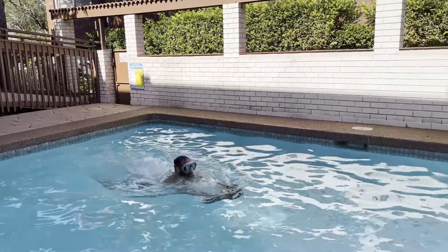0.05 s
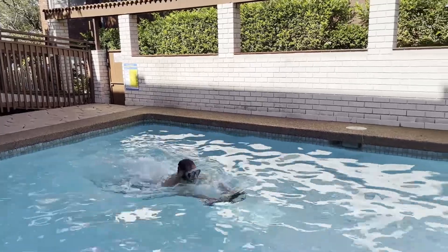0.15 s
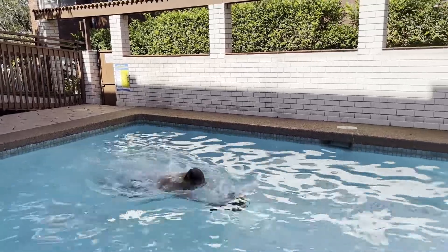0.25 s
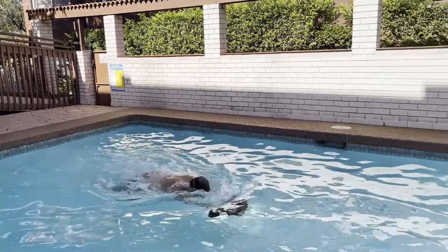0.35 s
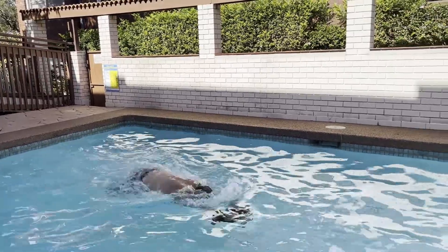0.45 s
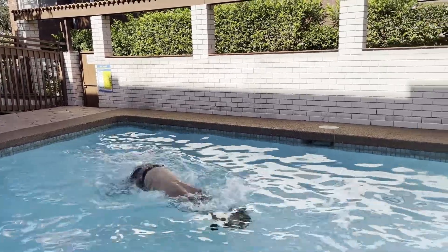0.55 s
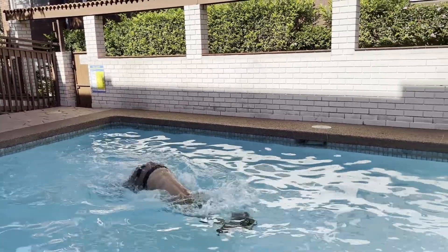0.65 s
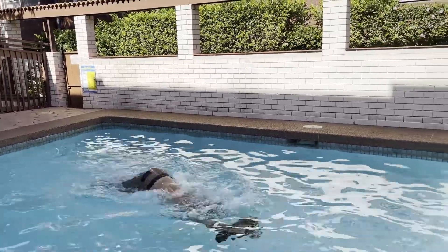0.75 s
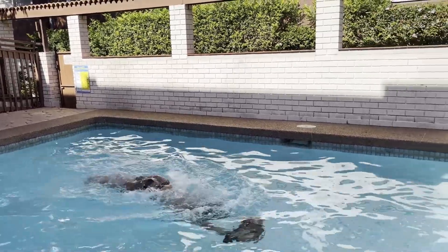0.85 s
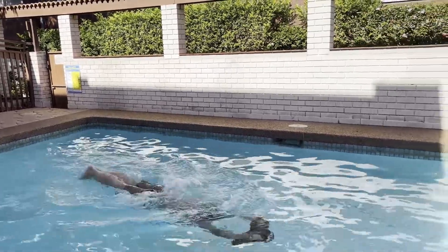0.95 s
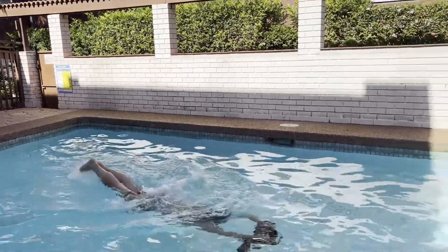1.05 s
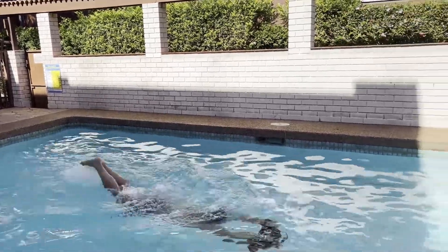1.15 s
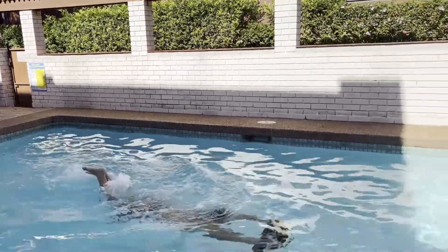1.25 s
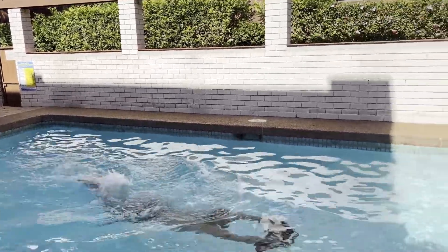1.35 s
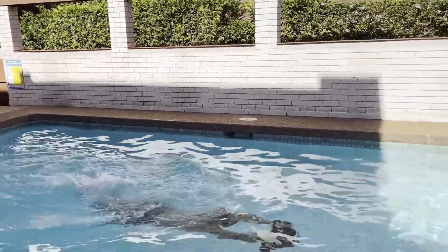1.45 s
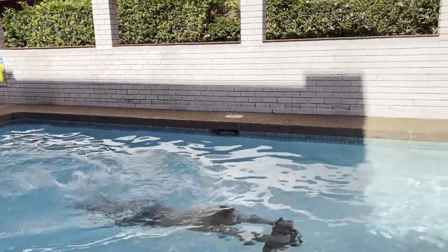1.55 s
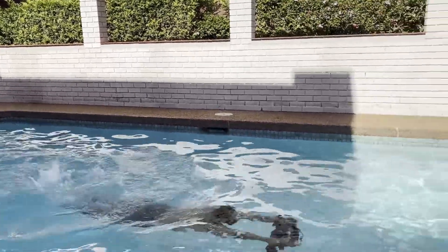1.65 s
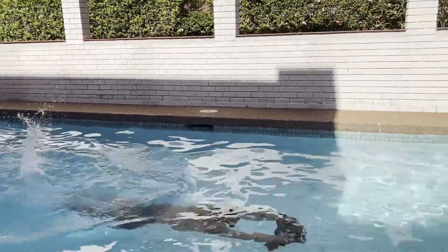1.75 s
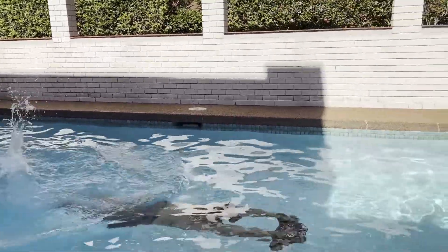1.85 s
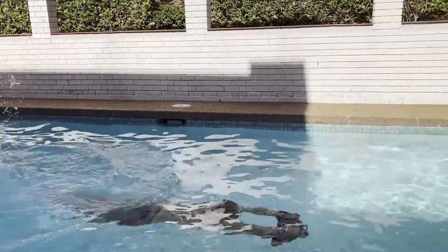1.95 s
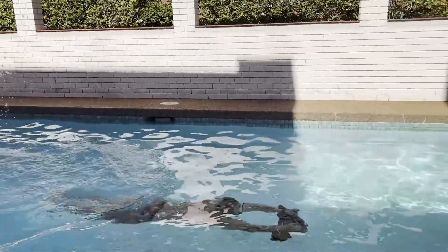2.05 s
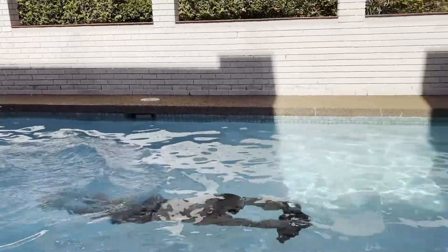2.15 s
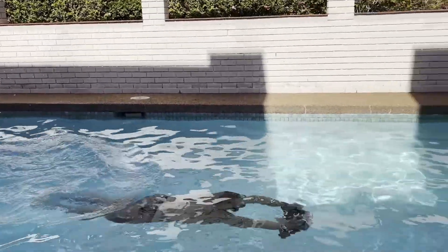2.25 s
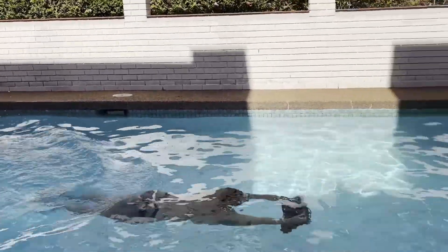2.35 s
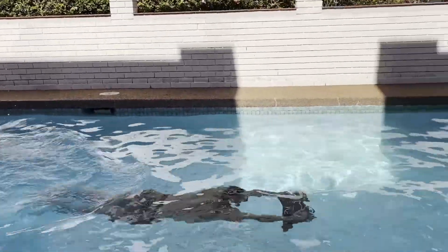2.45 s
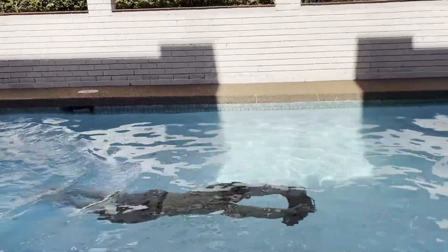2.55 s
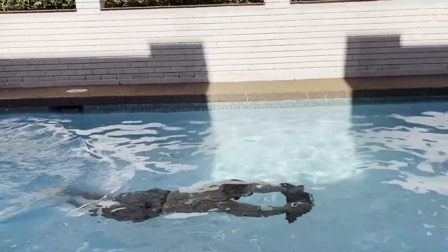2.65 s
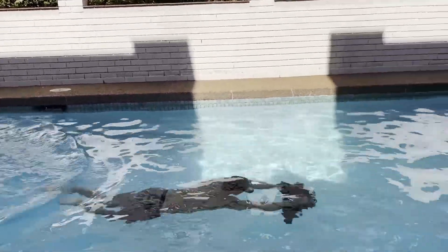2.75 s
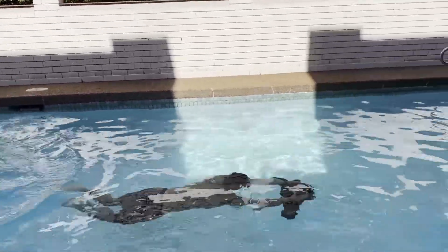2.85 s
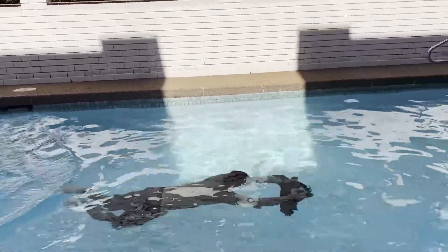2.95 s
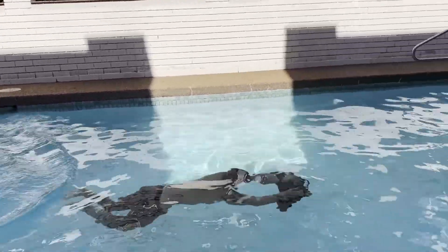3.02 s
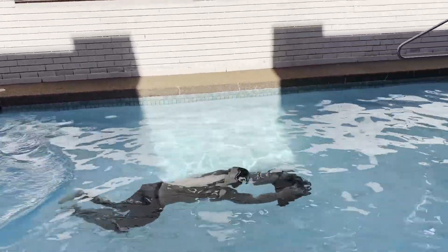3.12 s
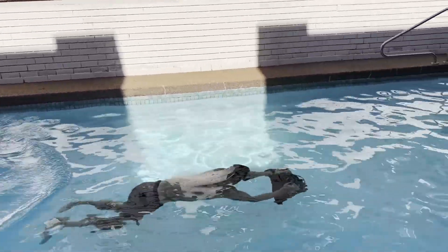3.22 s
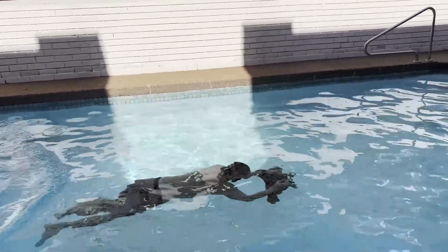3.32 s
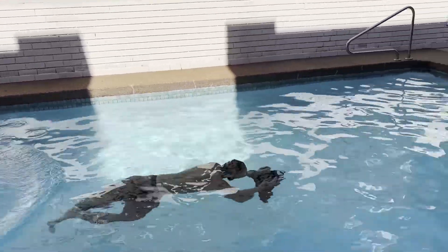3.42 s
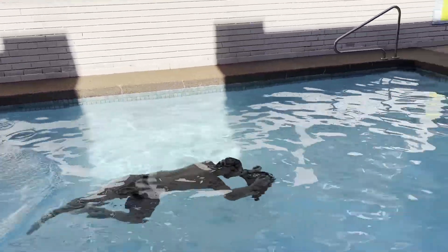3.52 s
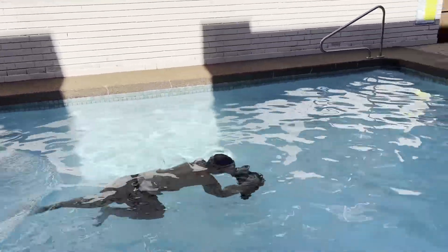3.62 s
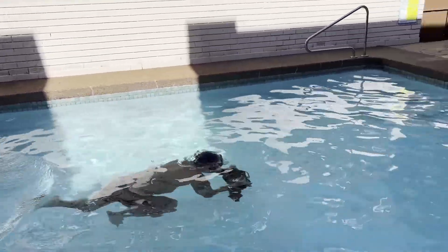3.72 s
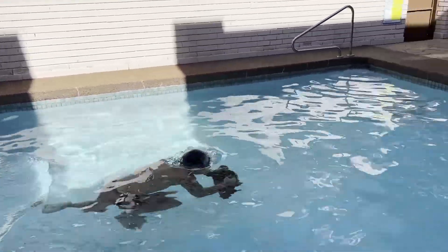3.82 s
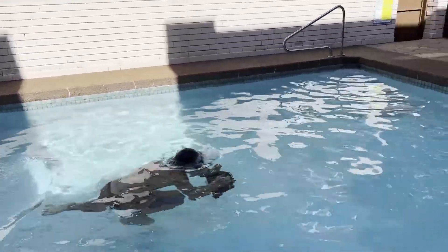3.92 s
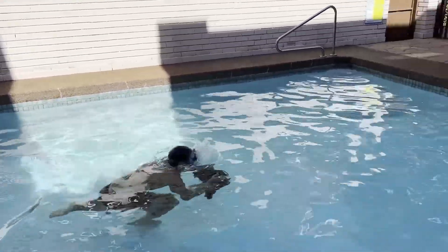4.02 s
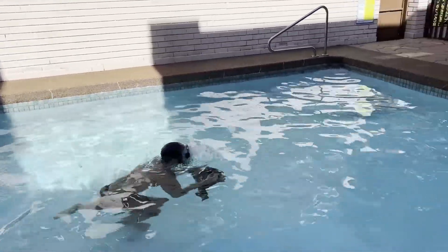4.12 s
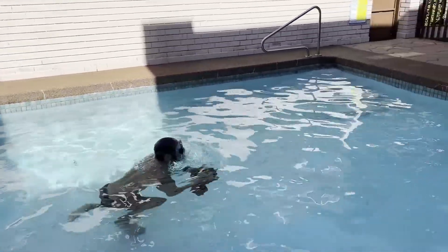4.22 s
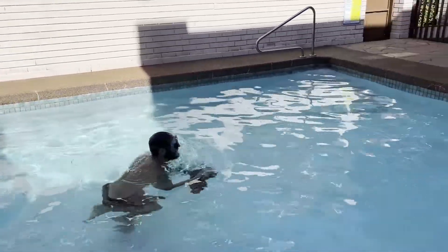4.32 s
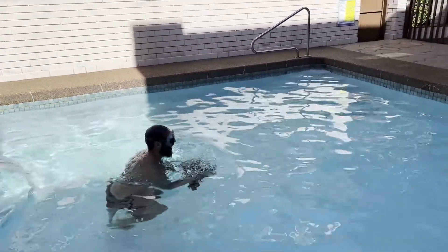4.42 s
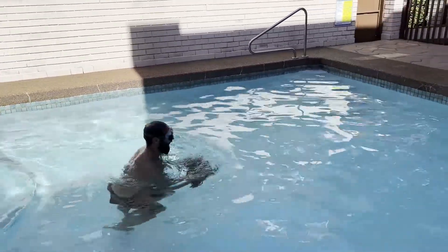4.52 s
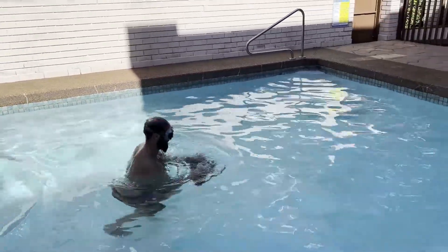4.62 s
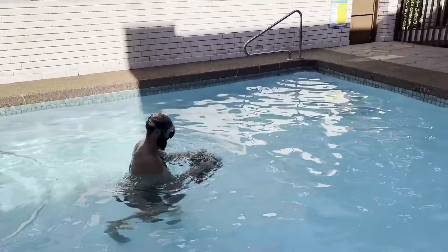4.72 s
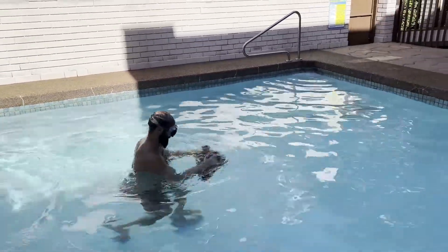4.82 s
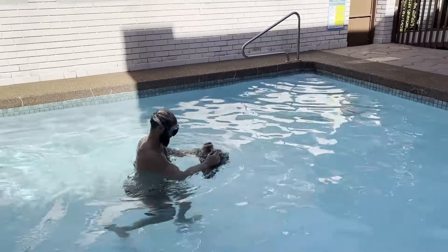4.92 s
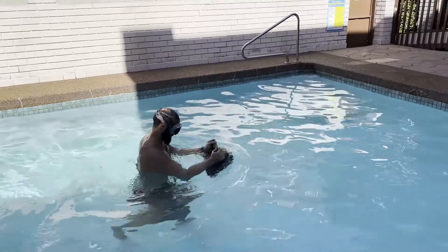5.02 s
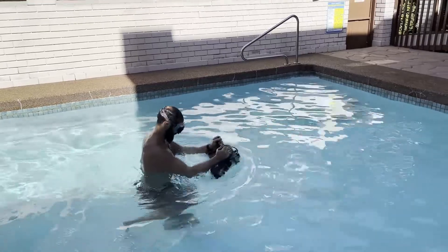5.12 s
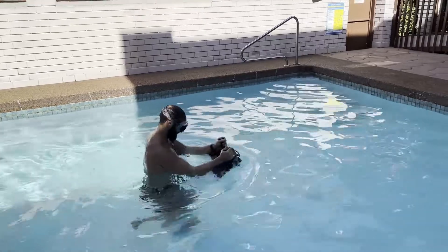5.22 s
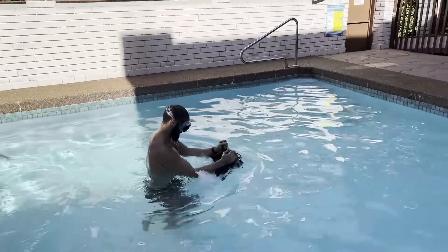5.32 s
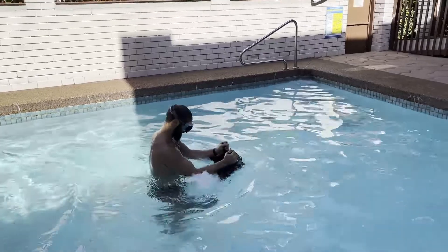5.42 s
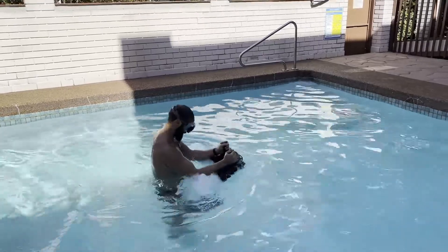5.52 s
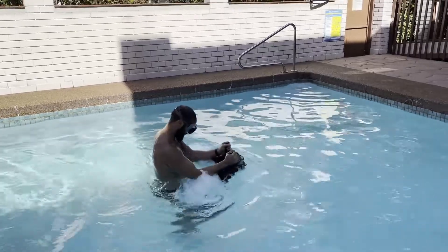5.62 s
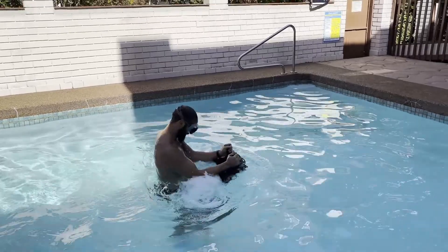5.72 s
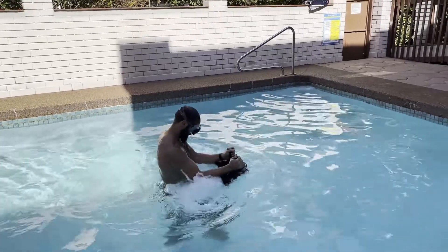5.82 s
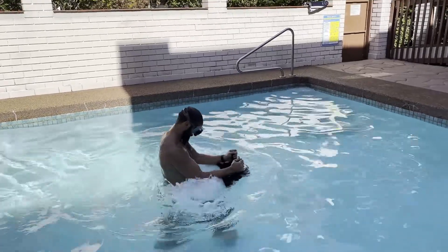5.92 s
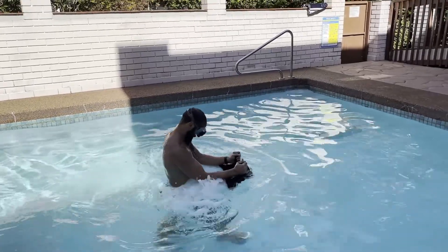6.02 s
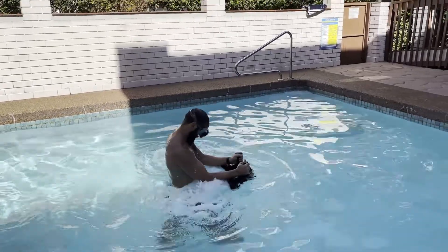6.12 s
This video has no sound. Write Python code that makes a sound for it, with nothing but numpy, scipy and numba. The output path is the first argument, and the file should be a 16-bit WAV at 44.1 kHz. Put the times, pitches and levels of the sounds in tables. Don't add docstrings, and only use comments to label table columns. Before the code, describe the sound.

Moderate washing water and plinking drops open the scene, swelling to a heavy low glug as the swimmer goes under. The water calms to sparse pops and drips above a soft traffic rumble. Bubbles blurt as he surfaces and a bird calls briefly. Then thrusters at the surface spit and boil loudly, their blades humming in wavering tones. Stereo poolside pickup, with short reflections from brick walls.

```python
import sys
import numpy as np
from scipy import signal
from scipy.fft import rfft, irfft, next_fast_len
from scipy.io import wavfile
from scipy.ndimage import uniform_filter1d
from numba import njit

SR = 44100
rng = np.random.default_rng(int(sys.argv[2]) if len(sys.argv) > 2 else 0)


def boost(x):
    u = np.asarray(x, float) / 20
    return 10 ** u


def output_pcm(signal):
    pcm = np.clip(np.atleast_2d(signal).T, -1, 1) * 32767
    wavfile.write(sys.argv[1], SR, np.round(pcm).astype(np.int16))


N = 271849

# f/Hz, density/dB
YARD_COLOUR = [(22, -19.5), (40, 1.5), (55, 4), (140, -10), (250, -21.5), (500, -19.5), (1000, -27),
               (1700, -32.5), (2700, -40), (4500, -53), (8000, -50.5), (16000, -45)]
YARD_DB = -39
# t/s, level/dB
YARD_SWELL = [(0.0, -37), (0.41, -44), (0.99, -40), (1.54, -44.5), (1.65, -36.5), (2.01, -42.5),
              (3.28, -43.5), (3.48, -39), (3.59, -42.5), (3.98, -38.5), (4.29, -48.5), (4.46, -37.5),
              (4.63, -44), (5.46, -39.5), (6.16, -43)]
# f/Hz, likeness [-1 to 1]
NEAR_LIKENESS = [(60, 0.9346), (130, 1), (290, 0.88), (640, 0.32), (1410, -0.081), (3100, 0.4),
                 (6820, -0.81), (15000, -0.38)]
FAR_LIKENESS = [(60, 0.99), (130, 0.93), (290, 0.5), (640, -0.89), (1410, -1), (3100, -0.35), (6820, -0.17),
                (15000, -0.19)]

# f/Hz, density/dB
WAKE_COLOUR = [(90, 0), (190, -2.5), (330, -4), (450, -7), (850, -4), (1600, -12), (2500, -12), (3200, -15),
               (4700, -17), (5700, -17.5), (7000, -9.5), (10000, -17), (12600, -14), (15800, -22)]
# t/s, level/dB, brightness/dB
STIR = [(0.0, -36.5, -9), (.32, -38.5, -6.5), (.7, -32, -8.5), (.87, -36, -10), (1.225, -31, -11),
        (1.32, -38, -7.5), (1.55, -40, -5.5), (1.9, -48.5, -6.5), (2.2, -42, -3), (2.31, -48.5, 2.5),
        (2.48, -53, 3.5), (2.85, -55.5, 4), (2.9, -55, -1.5), (3.3, -57, -5.5), (3.45, -60, -7),
        (3.68, -66, -12), (3.8, -55.5, -13), (4.04, -44.5, -9.5), (4.21, -45.5, -6), (4.34, -54, -2.5),
        (4.55, -57, -5), (5.04, -52.5, -5)]
# t/s, peak level/dB, brightness/dB, time to fall 10 dB/s
SPLASHES = [(.24, -41, -3.5, 0.111), (1.37, -36.5, -5, 0.0799), (1.637, -30.5, -10.5, 0.064),
            (1.81, -41, -3.5, 0.0749), (2.12, -47.5, 5.5, 0.0527), (2.531, -53, 10, 0.115),
            (2.67, -59, 10.5, 0.12), (2.35, -53, 7, 0.05), (3.775, -54, -9, 0.2), (4.245, -52, 3, 0.01),
            (3.89, -47, -8, 0.05), (1.08, -34, -14, 0.04), (3.957, -36, -7.5, 0.04), (4.0, -43, -8, 0.03),
            (4.349, -45, 3.5, 0.0228), (4.74, -58, 5, 0.06)]
# t/s, peak level/dB, time to fall 10 dB/s
HEAVES = [
    (.7, -42, 0.9),
    (1.15, -36, 0.02),
    (1.37, -39, -0.0017),
    (1.54, -35, 0.0594),
    (1.63, -27.5, 0.05),
    (1.87, -46, 0.6),
    (3.945, -33, 0.06),
]
RISE_SHARE = 0.45
SPRAY_BELOW_DB, BURST_SPRAY_BELOW_DB = -6, -5
SLOSH_DB, SLOSH_FOLLOWS = -49, 0.28
SPLASH_ABOVE_HZ = 2030

# t/s, peak level/dB, f/Hz, decay/cycles
GULPS = [(0.052, -38.5, 186.3, 54), (.13, -36, 182.3, 52), (1.083, -27, 333, 18), (1.51, -28, 309, 18),
         (1.512, -29.5, 195, 9.15), (1.596, -13.5, 205.4, 6), (1.612, -16, 206, 6), (1.622, -24.5, 700, 25),
         (1.635, -17.5, 69.14, 2.54), (1.69, -29.5, 56.4, 9.6), (2.141, -38, 356, 17),
         (2.185, -36, 500, 12), (2.24, -39, 635, 12), (2.318, -38, 430, 16), (2.3, -44, 1594, 27.16),
         (3.7064, -37, 115.5, 55.16), (3.775, -41, 718, 26), (3.81, -42, 733, 23.32),
         (3.855, -39.5, 650, 27), (4.09, -35, 279.9, 14), (4.598, -47.5, 1602, 33),
         (4.62, -42, 1657, 19.62), (4.812, -37, 986, 14)]
# t/s, peak level/dB, f/Hz, decay/cycles
RISERS = [(1.785, -31, 810, 13.25), (3.71, -52.5, 740, 42.3), (3.885, -29.5, 200, 9.5),
          (3.928, -21.5, 265, 6.8), (3.948, -24.5, 327, 5.4), (3.966, -26, 305, 7.4), (3.98, -33, 380, 6.3),
          (3.998, -27, 400, 13), (4.04, -36, 470, 8), (4.145, -35.5, 670, 10), (4.193, -31, 600, 6.2),
          (4.59, -43, 1096, 21)]
# t/s, peak level/dB, f/Hz, decay/cycles
SUCKED = [(5.098, -9, 223, 5.3), (5.098, -14, 474, 30), (5.072, -13.5, 740, 18), (5.11, -12, 770, 22),
          (5.093, -12, 700, 12), (5.095, -22, 950, 20), (5.27, -15, 915, 28), (5.26, -21, 800, 22),
          (5.315, -19, 1020, 57), (5.32, -14.5, 760, 40), (5.35, -21.5, 745, 40), (5.31, -22, 505, 25),
          (5.585, -20, 805, 34), (5.6, -18, 1158, 45)]
# t/s, peak level/dB, f/Hz, decay/cycles
POPS = [(2.11, -37, 2450, 30), (2.15, -38, 2400, 30), (2.222, -36, 2310, 27), (2.25, -36, 2480, 30),
        (2.27, -39, 2250, 30), (2.34, -39, 2260, 30), (2.287, -38, 4300, 9.1), (2.35, -34, 3800, 27.7),
        (2.474, -34, 5100, 16), (2.49, -44, 3100, 8), (2.6, -37, 3292, 10.64), (2.717, -48, 2300, 10),
        (2.755, -41, 4100, 12), (2.762, -38.5, 5770, 6.21), (2.79, -52, 2500, 10), (2.832, -37, 5200, 12.9),
        (2.873, -45, 3800, 8), (2.994, -35, 7200, 5.23), (3.013, -50, 5100, 8), (3.14, -47, 1559, 6.22),
        (3.17, -46, 2600, 10.53), (3.21, -53, 4250, 12), (3.215, -48, 1350, 15.26), (3.295, -49, 2433, 14),
        (3.33, -50, 2650, 12), (3.375, -53, 1680, 15.18), (3.462, -54, 2832, 20), (3.722, -47, 870, 15.2),
        (3.752, -44.5, 2700, 6.36), (3.755, -47, 1120, 14), (3.773, -41, 3500, 6.2), (3.857, -44, 1900, 6),
        (3.892, -43, 2490, 20), (3.9, -40, 1150, 10), (3.932, -31, 720, 5), (3.941, -32, 1030, 8.79),
        (3.945, -32, 2800, 11), (3.955, -29, 1050, 6), (3.956, -31, 1600, 7), (3.992, -34, 1039, 11.18),
        (3.993, -41, 2700, 6), (4.122, -39, 1300, 5), (4.198, -42.5, 935.5, 12), (4.02, -36, 560, 6.7),
        (4.06, -38, 520, 8), (4.459, -48, 1680, 17.5), (4.62, -51, 1280, 12), (4.683, -58, 4150, 16),
        (4.71, -51, 2250, 10), (4.755, -45, 4470, 16), (4.755, -55, 3300, 12), (4.769, -47, 1800, 7),
        (4.832, -52, 3000, 20.47)]
# t/s, peak level/dB, f/Hz, decay/cycles
SPITS = [(5.05, -25, 1600, 15), (5.09, -6, 950, 4), (5.109, -1, 654, 3.2), (5.12, -7, 890, 4),
         (5.1292, 3, 900, 1.8), (5.128, -16, 195, 7.3), (5.388, -29, 4700, 30), (5.485, -30, 6550, 90),
         (5.51, -30, 6660, 90), (5.175, -19, 1690, 24), (5.24, -21, 1750, 15.54), (5.268, -18, 1412, 6.6),
         (5.374, -11, 1020, 3.2), (5.4, -19, 2210, 24.54), (5.41, -23, 1758, 12), (5.42, -21, 2550, 20.36),
         (5.445, -15, 1840, 12), (5.447, -18, 2350, 12), (5.537, -22, 1290, 8), (5.59, -18, 825, 21.3),
         (5.63, -21, 1954, 30), (5.645, -18, 1340, 25.2), (5.652, -14, 1047, 19), (5.655, -17, 1630, 24),
         (5.69, -15, 747, 14), (5.71, -18, 830, 17.5), (5.73, -23, 2297, 25), (5.76, -23, 875, 20),
         (5.94, -17.5, 2000, 6.49), (5.98, -26, 2153, 18.46), (6.01, -20, 775, 14), (6.09, -24, 1850, 32),
         (6.13, -27, 1829, 27), (6.14, -19, 697, 10.86)]
GULP_RISE, RISER_RISE, SUCKED_RISE, POP_RISE, SPIT_RISE = 0.00063, 0.0117, .0007, 0.003804, 0.0018

# t/s, peak level/dB, level of the duller part/dB
TICKS = [(0.1247, -36, -52.5), (0.18, -36, -37), (0.9133, -35, -56), (1.361, -27, -33.5), (1.492, -34, -42),
         (2.0542, -35, -51.5), (2.111, -30, -32.5), (2.5098, -34.5, -46), (2.599, -38.5, -44),
         (2.6511, -30, -40), (2.669, -29, -38), (2.749, -38, -52), (2.762, -42, -41), (2.7789, -34.5, -52),
         (2.834, -31, -46), (3.0115, -35, -55.5), (3.1464, -36, -50), (3.233, -35.5, -62.5),
         (3.722, -42, -47), (3.805, -55, -56), (3.8816, -46, -62.5), (3.93, -41.5, -47),
         (4.3435, -49, -50.5), (4.9007, -42.5, -52)]
# t/s, peak level/dB, f/Hz
DROPS = [(0.174, -25.5, 1460), (0.3514, -22, 1900), (0.9524, -27, 2020), (1.3595, -27, 1205),
         (1.8087, -24.5, 3760), (2.0732, -30, 2308), (2.0863, -27.5, 2308), (2.1112, -32, 2360),
         (2.3062, -24.5, 4108), (2.4155, -39.5, 3723), (2.4631, -30, 4520), (2.531, -24.5, 3352),
         (2.599, -28.5, 2172), (2.655, -28, 3230), (2.976, -38, 2703), (3.1035, -35, 1638),
         (3.2116, -37.5, 1357), (3.3723, -45, 1685), (3.7219, -41, 3221), (3.7709, -46, 1240),
         (3.932, -36, 2806), (3.9624, -16.5, 2411), (4.0955, -45.5, 1420), (4.122, -30, 2570),
         (4.149, -33, 1614), (4.3299, -41, 1495), (4.344, -30, 2376), (4.6992, -35, 2300),
         (4.879, -39, 1874), (4.9397, -43, 4000)]

# t/s, level/dB
FAR_CHIRP = [
    (3.39, -95),
    (3.42, -71),
    (3.5, -68),
    (3.54, -73),
    (3.6, -73),
    (3.68, -85),
]
# t/s, f/Hz, level/dB
BIRD = [
    (4.44, 2290, -75),
    (4.47, 2280, -58),
    (4.51, 2380, -76),
    (4.545, 2440, -61),
    (4.61, 2435, -60),
    (4.655, 2405, -56),
    (4.69, 2310, -60),
    (4.76, 2230, -66),
    (4.82, 2240, -78),
]
BIRD_OCTAVE_DB, OCTAVE_FADE_DB_PER_HZ = -3.5, .035
BIRD_ECHO_S, BIRD_ECHO_DB = .065, -6

# t/s, level/dB, brightness/dB
FROTH = [(5.013, -48.5, -22), (5.041, -44.5, -14), (5.059, -23.5, -12.5), (5.095, -17, -13.5),
         (5.225, -25.5, -10), (5.3, -20, -14), (5.37, -21, -16), (5.415, -22, -7), (5.47, -22.5, -8),
         (5.53, -22, -9), (5.616, -18, -12.5), (5.67, -19, -11.5), (5.806, -24.5, -6), (5.92, -24.5, -8.5),
         (6.02, -24.5, -7.5), (6.1, -24, -6)]
# f/Hz, density/dB
FROTH_COLOUR = [(100, -22), (200, -15.5), (310, -11.5), (410, -20.5), (530, -12), (770, -4), (1100, -9),
                (1500, -15), (2300, -12), (3100, -19), (4600, -19.5), (5700, -30.5), (6800, -30),
                (15800, -37)]
BOIL_CEILING_DB = -22.5
FROTH_SPRAY_DB, SPRAY_FOLLOWS = -17.5, 1
RIM_ECHO_S, RIM_ECHO_DB = .00685, -12.5
# t/s, f/Hz, level/dB, octave level/dB
FAST_BLADES = [(5.12, 307.8, -39, -30), (5.195, 318, -17.5, -35), (5.245, 324, -43, -43),
               (5.44, 297, -46, -32), (5.47, 299, -26.5, -42), (5.51, 308.6, -22, -46.5),
               (5.56, 317, -28, -47), (5.66, 322, -33, -49), (5.76, 312, -53, -39),
               (5.86, 311.5, -25.5, -42), (5.92, 310, -39, -39), (5.99, 310.8, -28, -36),
               (6.045, 309.8, -42, -36), (6.09, 309.7, -31, -40), (6.16, 308, -34, -36)]
SLOW_BLADES = [(5.28, 258.4, -46, -48), (5.31, 260, -28, -36), (5.345, 263, -22, -34),
               (5.41, 266, -38, -39), (5.5, 270.3, -36, -30.5), (5.56, 270.3, -32, -29.5),
               (5.61, 271, -26.5, -23), (5.65, 273, -27, -35), (5.7, 272, -25, -31), (5.74, 267, -45, -29),
               (5.8, 265.6, -38.5, -53), (5.9, 264.7, -38, -39), (5.96, 264, -42, -31),
               (6.02, 264.4, -46, -43), (6.12, 265.3, -45, -35), (6.16, 265, -39, -32)]
BLADE_WAVER, BLADE_ROUGH_DB = .011, 3.4

# delay t/s, level/dB
WALL_ECHOES = [
    (.011, -24),
    (.019, -11),
    (.031, -9),
    (.047, -9),
]

IN_STEP_HZ, TURN_HZ, FOLLOWING = 6956.8, 5757, 0.38
# f/Hz, phase/rad
LOW_PHASE = [(500, 1), (1000, -1.19), (3800, -1.1323), (5500, 1), (6300, -0.12)]
# low f/Hz, high f/Hz
SUM_GAPS = [(9650, 10300), (15300, 16000)]
DIFFERENCE_GAPS = [(6500, 7450), (12400, 13200)]
# t/s, length/s
FILLED = [
    (0.157, 0.0475),
    (1.337, 0.0426),
    (2.051, 0.0662),
    (2.642, 0.0512),
    (2.74, 0.1784),
    (3.872, 0.07),
    (4.89, 0.0588),
    (5.024, 0.02127),
    (5.444, 0.051),
]
RAGGED_HZ, TOP_HZ, LAST_HZ = 300, 15800, 16430


def rms_one(x):
    return x / np.sqrt(np.mean(x ** 2) + 1e-20)


def in_time(rows, silent=None):
    s, *columns = np.transpose(rows)
    return [np.interp(np.arange(N) / SR, s, c, left=silent, right=silent) for c in columns]


def at_hz(points, hz):
    f, value = np.array(points).T[:2]
    return np.interp(np.log(hz), np.log(f), value)


def drift(rate):
    r = np.exp(-80 * np.pi * rate / SR)
    slow = signal.lfilter([1], [1, -2 * r, r * r], rng.standard_normal(N // 40 + 2002))[2000:]
    return np.interp(np.arange(N) / 40, np.arange(len(slow)), rms_one(slow))


def banded_noise(colour, likeness, low_hz, high_hz, patchy_db, together_db):
    count = max(2, round(np.log2(high_hz / low_hz) / .4))
    edges = np.geomspace(low_hz, high_hz, count + 1)
    out, together, white = 0, drift(37.0), rng.standard_normal((2, 2, N))
    for k, (low, high) in enumerate(zip(edges, edges[1:])):
        band = signal.butter(2, [low, high], "band", fs=SR, output="sos")
        mid, side = signal.sosfilt(band, white[k % 2])
        hz = np.sqrt(low * high)
        alike = np.clip(at_hz(likeness, hz), -1, 1)
        gain = boost(at_hz(colour, hz) + together_db * together + patchy_db * drift(11.3))
        out = out + gain * (np.sqrt(1 + alike) * mid + np.sqrt(1 - alike) * side * [[1], [-1]])
    return rms_one(out)


@njit
def bubble_tones(start, height, hz, cycles, rise, pan, lag, size, rate):
    out = np.zeros((2, size + 64))
    for e in range(len(start)):
        f, phase = hz[e], 0.0
        for i in range(max(start[e], 0), size):
            turns = phase / (2 * np.pi)
            if turns > 3 * cycles[e] or f > .45 * rate:
                break
            v = height[e] * np.sin(phase) * min(turns, 1.0) * np.exp(-2.3 * turns / cycles[e])
            out[0, i + 8] += v * pan[e]
            out[1, i + 8 + lag[e]] += v / pan[e]
            phase += 2 * np.pi * f / rate
            f *= 1 + rise[e] * f / rate
    return out[:, 8:size + 8]


def bubbles(s, db, hz, cycles, rise, pan_db):
    lag = np.clip(np.round(pan_db * 0.42), -8, 8).astype(np.int64)
    start = (s * SR).astype(np.int64)
    return bubble_tones(start, boost(db), hz, cycles, rise, boost(pan_db / 2), lag, N, float(SR))


def swarm(colour, count, low_hz, high_hz, cycles, uneven_db):
    u = rng.random((count, 6))
    hz = low_hz * (high_hz / low_hz) ** u[:, 1]
    db = -uneven_db * np.log(u[:, 2] + 0.016) + at_hz(colour, hz) + 6 * np.log2(hz / low_hz)
    db += 2.3 * drift(18)[(u[:, 0] * N).astype(int)]
    s, rise, pan_db = u[:, 0] * N / SR, 0.003648 * u[:, 4], 5 * (u[:, 5] - .5)
    return rms_one(bubbles(s, db, hz, cycles * (.5 + u[:, 3]), rise, pan_db))


def water(colour, gurgle_db, splash_db, spray_db, low_hz, bubbly, dense):
    def hiss(low, high, patchy_db, together_db):
        return banded_noise(colour, NEAR_LIKENESS, low, high, patchy_db, together_db)

    def mix(grains, noise, share):
        return np.sqrt(np.clip(share, 0, 1)) * grains + np.sqrt(np.clip(1 - share, 0, 1)) * noise

    gurgle = mix(swarm(colour, 5000 * dense, low_hz, 2800, cycles=22.4, uneven_db=2.5),
                 hiss(low_hz, 2764, patchy_db=1.0, together_db=0.94), bubbly)
    splash = mix(swarm(colour, 7000 * dense, 1300, 5432.0, cycles=21, uneven_db=2.5),
                 hiss(1270, 5110.0, patchy_db=1.5, together_db=0.95), 0.82 * bubbly)
    spray = mix(swarm(colour, 12000 * dense, 5326.3, 15632, cycles=1.8, uneven_db=2.5),
                hiss(5640.0, 15900, patchy_db=2.0, together_db=1.0), 0.85 * bubbly)
    gurgle = signal.sosfilt(signal.butter(3, SPLASH_ABOVE_HZ, "low", fs=SR, output="sos"), gurgle)
    splash = signal.sosfilt(signal.butter(3, SPLASH_ABOVE_HZ, "high", fs=SR, output="sos"), splash)
    return boost(gurgle_db) * gurgle + boost(splash_db + 1.5) * splash + boost(spray_db + 4.5) * spray


def bursts(s, db, fall_s):
    late = (np.arange(N)[:, None] / SR - s) / fall_s
    return boost(2 * (db - 10 * np.maximum(late, -late / RISE_SHARE))).sum(axis=1)


def yard():
    rumble = banded_noise(YARD_COLOUR, FAR_LIKENESS, 31.6, 109.89, patchy_db=0.2, together_db=-2.0)
    drone_hz = 53 * (1 + 0.1144 * drift(5.76))
    drone = np.sqrt(2) * np.sin(2 * np.pi * np.cumsum(drone_hz) / SR)
    hiss = banded_noise(YARD_COLOUR, FAR_LIKENESS, 111.0, 17342, patchy_db=-1.0, together_db=1.4)
    low = boost(-0.5) * rumble + boost(-5.0) * drone
    return boost(in_time(YARD_SWELL)[0]) * low * boost([[-.55], [.55]]) + boost(YARD_DB - 10.8) * hiss


def wake():
    level_db, bright_db = in_time(STIR, silent=-120)
    s, db, sharp_db, fall_s = np.transpose(SPLASHES)
    steady = level_db, level_db + bright_db, level_db + bright_db + SPRAY_BELOW_DB
    sudden = db, db + sharp_db, db + sharp_db + BURST_SPRAY_BELOW_DB
    upper = [10 * np.log10(boost(2 * a) + bursts(s, b, fall_s)) for a, b in zip(steady, sudden)]
    slosh_db = SLOSH_DB + SLOSH_FOLLOWS * (level_db + 48.0)
    heave = np.sqrt(boost(2 * slosh_db) + bursts(*np.transpose(HEAVES)))
    slosh = banded_noise(WAKE_COLOUR, NEAR_LIKENESS, 99.8, 330.0, patchy_db=4.5, together_db=-0.5977)
    washing = water(WAKE_COLOUR, *upper, low_hz=320, bubbly=.38, dense=1)
    return boost(-2.5) * heave * slosh + boost(-1.2) * washing


def gulps():
    kinds = GULPS, RISERS, SUCKED, POPS, SPITS
    s, db, hz, cycles = np.transpose(sum(kinds, []))
    rises = [GULP_RISE, RISER_RISE, SUCKED_RISE, POP_RISE, SPIT_RISE]
    rise = np.repeat(rises, [len(k) for k in kinds])
    return bubbles(s, db, hz, np.maximum(cycles, 1), rise, 0 * s)


def ticks():
    s, bright_db, dull_db = np.transpose(TICKS)
    out, hiss = 0, rng.standard_normal(N)
    for db, edges_hz in ((bright_db + 5.5, [9000, 16400]), (dull_db + 11.5, [3500, 9000])):
        hits = np.zeros(N)
        hits[np.round(s * SR).astype(int)] = boost(db)
        decay = signal.lfilter([1], [1, -boost(-60 / (0.014 * SR))], hits)
        puff = 0.7257 * decay * hiss + 1.4 * hits
        out = out + signal.sosfilt(signal.butter(2, edges_hz, "band", fs=SR, output="sos"), puff)
    return out * np.ones((2, 1))


def drops():
    s, db, hz = np.transpose(DROPS)
    u = rng.random((len(s), 3))
    cycles, rise = 6.1 * (0.6926 + u[:, 0]), 0.00447 * u[:, 1]
    return bubbles(s, db - 2.0, hz, cycles, rise, 1.3 + 3 * u[:, 2])


def birds():
    band = signal.butter(2, [5250, 5650], "band", fs=SR, output="sos")
    husk = signal.sosfilt(band, rng.standard_normal((2, N)))
    far = boost(in_time(FAR_CHIRP, silent=-140)[0]) * rms_one(husk)
    hz, db = in_time(BIRD)
    t = np.arange(N) / SR
    singing = np.clip(np.minimum(t - BIRD[0][0], BIRD[-1][0] - t) / 0.01114, 0, 1)
    phase = 2 * np.pi * np.cumsum(hz * (1 + 0.00298 * drift(57.75))) / SR
    husky = boost(3 * drift(45) - 1.5)
    octave_db = db + BIRD_OCTAVE_DB - OCTAVE_FADE_DB_PER_HZ * (hz.max() - hz)
    tone = boost(db) * np.sin(phase) + boost(octave_db) * np.sin(2 * phase)
    near = np.sqrt(2) * singing * husky * tone
    near = sum(boost(k * BIRD_ECHO_DB) * np.roll(near, round(k * BIRD_ECHO_S * SR)) for k in range(4))
    return near * boost([[-1.5], [1.5]]) + far


def blades(rows, rough):
    hz, db, octave_db = in_time(rows)
    phase = 2 * np.pi * np.cumsum(hz * (1 + BLADE_WAVER * drift(25.409))) / SR
    running = np.clip((np.arange(N) / SR - rows[0][0]) / 0.021, 0, 1)
    tone = boost(db + rough * drift(20.0)) * np.sin(phase)
    octave = boost(octave_db + rough * drift(37.0)) * np.sin(2 * phase + 1)
    return np.sqrt(2) * running * (tone + octave)


def thrusters():
    level_db, bright_db = in_time(FROTH + [(N / SR, *FROTH[-1][1:])], silent=-120)
    spray_db = level_db + FROTH_SPRAY_DB + SPRAY_FOLLOWS * (bright_db + 9.5)
    levels = level_db, level_db + bright_db, spray_db
    boil = banded_noise(FROTH_COLOUR, NEAR_LIKENESS, 111.01, 509.0, patchy_db=1.2957, together_db=-1.5)
    boil = boost(np.minimum(level_db, BOIL_CEILING_DB) - 7.0) * boil
    slow = blades(SLOW_BLADES, rough=BLADE_ROUGH_DB) * boost([[.6], [-.6]])
    fast = blades(FAST_BLADES, rough=BLADE_ROUGH_DB) * boost([[-.6], [.6]])
    froth = boost(-1.4) * water(FROTH_COLOUR, *levels, low_hz=450, bubbly=.45, dense=2)
    echo = boost(RIM_ECHO_DB) * np.roll(froth, round(RIM_ECHO_S * SR), axis=1)
    return froth + echo + boil + slow + fast


def walls(x):
    dull = signal.lfilter([.45, -.45], np.convolve([1, -.55], [1, -.96]), x.mean(axis=0))
    out = np.zeros((2, N))
    for k, (s, db) in enumerate(WALL_ECHOES):
        out[k % 2, round(s * SR):] += boost(db) * dull[:N - round(s * SR)]
    return out


def scene():
    near = gulps() + drops() + ticks() + birds()
    return near + walls(near) + wake() + thrusters() + yard()


def microphone_pair(dry):
    left, right = rfft(dry, next_fast_len(N))
    hz = np.arange(len(left)) * SR / next_fast_len(N)
    share = np.interp(hz, [400, 1000, 4500, 6300], [0, .35, .35, np.clip(FOLLOWING, 0, 1)])
    lead = at_hz(LOW_PHASE, hz + 1) + 2 * np.pi * np.maximum(hz - IN_STEP_HZ, 0) / TURN_HZ
    follows = np.sqrt(share) * np.exp(1j * lead) * left
    mixed = follows + np.sqrt(1 - share) * right * np.where(hz > IN_STEP_HZ, 1j, 1)
    power, mixed_power = (uniform_filter1d(abs(v) ** 2, size=2000) for v in (right, mixed))
    return hz, left, mixed * np.sqrt(power / mixed_power)


def band_mask(hz, gaps, edge):
    below, above = edge
    spans = [(high if below is None else low + below, low if above is None else high + above)
             for low, high in gaps]
    return sum((hz > low) & (hz < np.minimum(high, TOP_HZ)) for low, high in spans)


def band_limit(x):
    return signal.sosfilt(signal.butter(12, 16500, fs=SR, output="sos"), x)


def record(dry):
    hz, left, right = microphone_pair(dry)
    both = np.array([left + right, left - right]) / 2 * (hz < LAST_HZ)
    t = np.arange(N) / SR
    at_tick = np.isin(np.arange(N), [round(row[0] * SR) for row in TICKS])
    snapping = uniform_filter1d(1. * at_tick, size=300) > 0
    filled = sum((t > s) & (t < s + d) for s, d in FILLED)
    calm = 1 - np.clip(filled + (uniform_filter1d(1. * snapping, size=700) > 0), 0, 1)
    out = irfft(both)[:, :N]
    out -= uniform_filter1d(1. - snapping, size=200) * irfft(both * (hz > TOP_HZ))[:, :N]
    for edge, chance in (((0, 0), 9), ((-RAGGED_HZ, None), -.2), ((None, RAGGED_HZ), -.2)):
        gate = uniform_filter1d(calm * (np.array([drift(9), drift(9)]) < chance) * 1., size=400)
        masks = [band_mask(hz, gaps, edge) for gaps in (SUM_GAPS, DIFFERENCE_GAPS)]
        out -= gate * irfft(both * masks)[:, :N]
    cut = signal.butter(2, 34, "high", fs=SR, output="sos")
    return band_limit(signal.sosfilt(cut, [out[0] + out[1], out[0] - out[1]]))


dry = scene()
out = record(dry)
output_pcm(out)
```